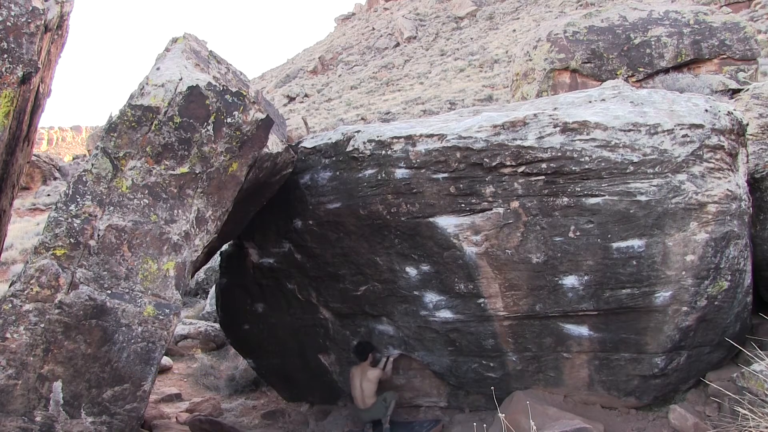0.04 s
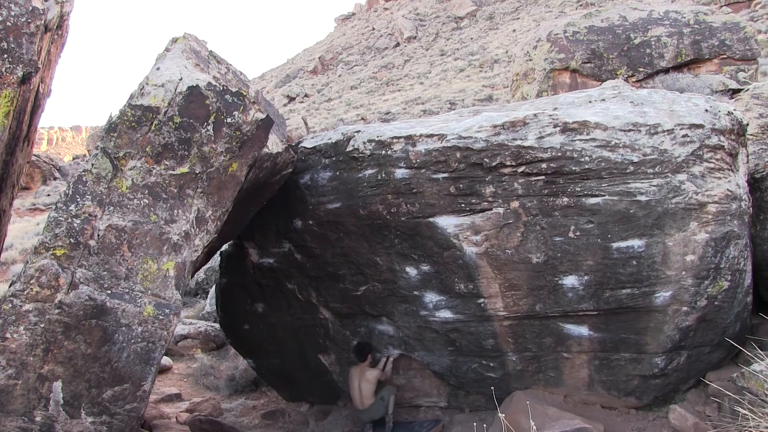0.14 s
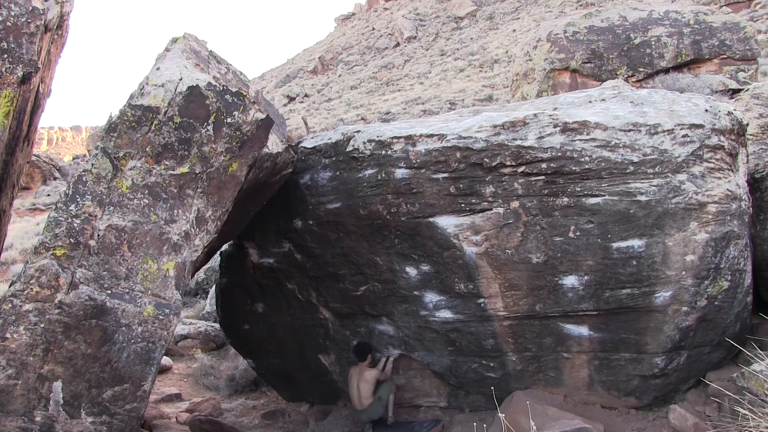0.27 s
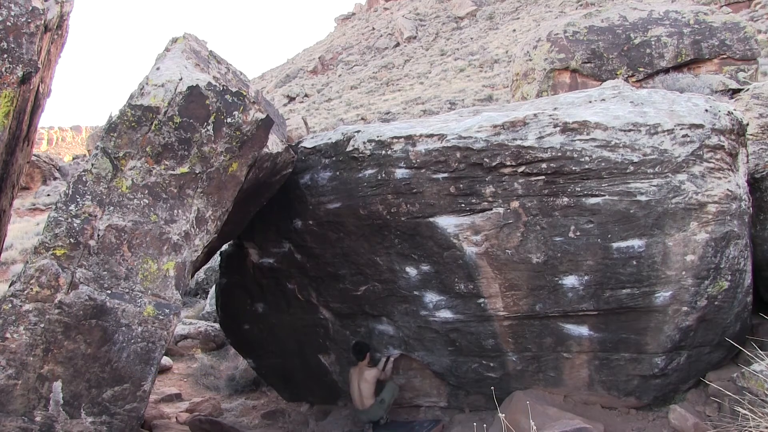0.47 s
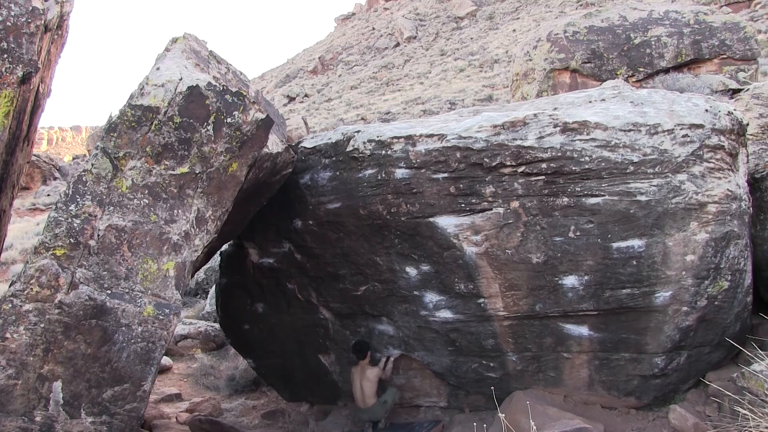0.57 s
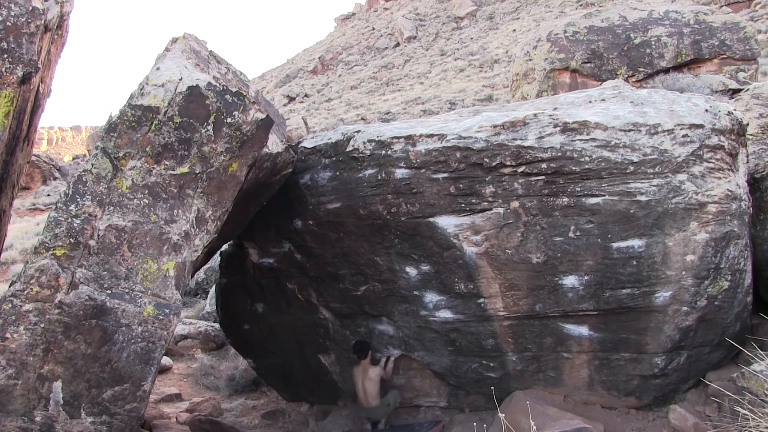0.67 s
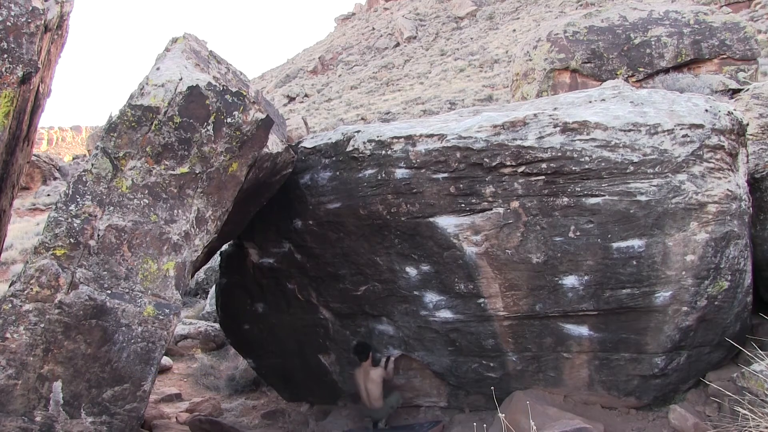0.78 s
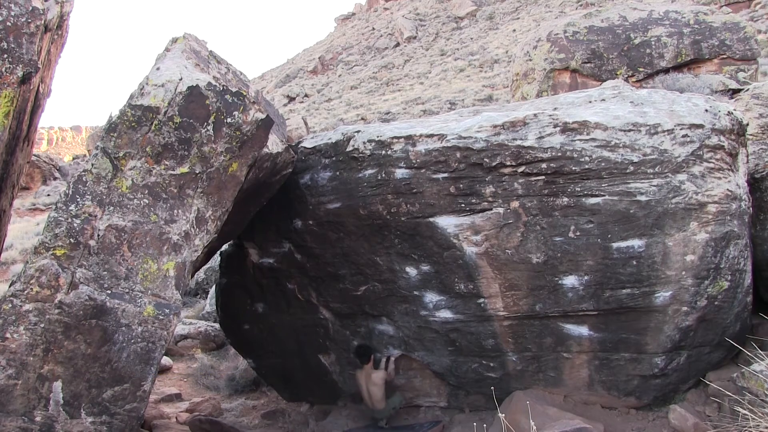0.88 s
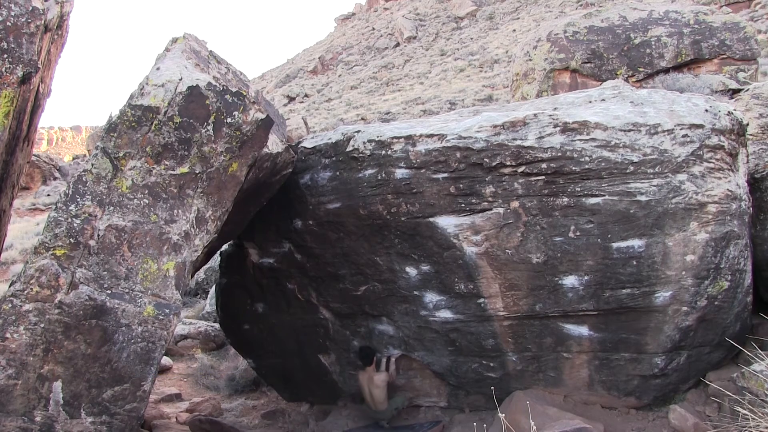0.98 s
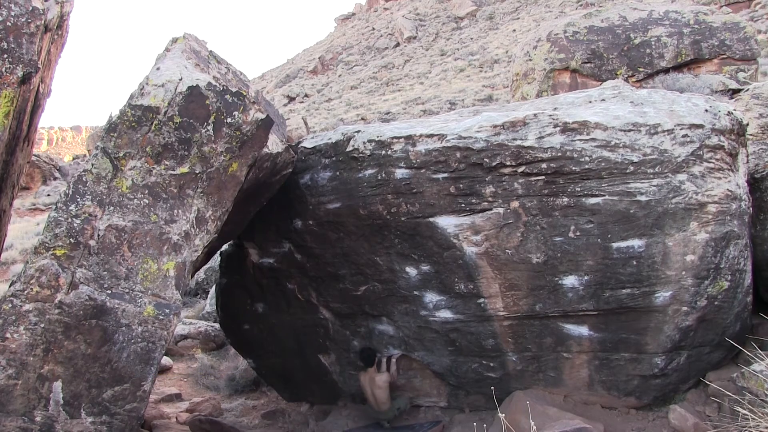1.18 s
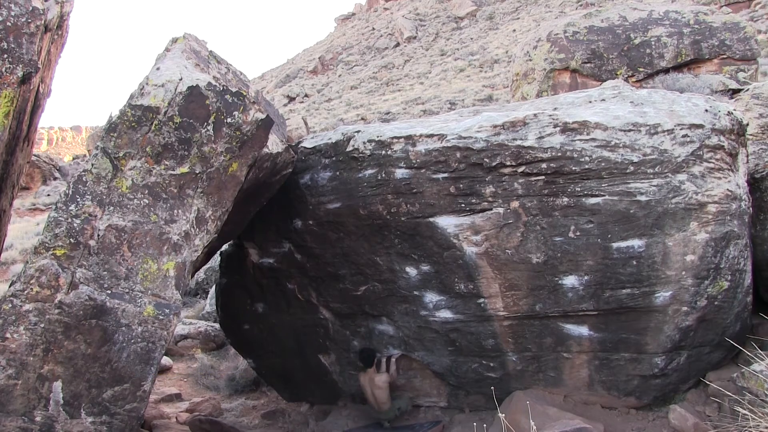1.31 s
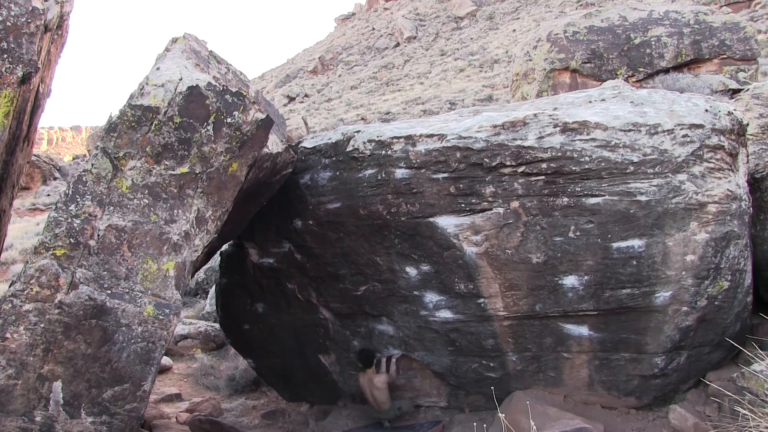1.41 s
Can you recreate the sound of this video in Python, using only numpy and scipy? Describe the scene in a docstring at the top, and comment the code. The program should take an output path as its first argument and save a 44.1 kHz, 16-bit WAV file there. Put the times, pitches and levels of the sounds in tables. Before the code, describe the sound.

A brush scrubs gritty rock in a short, swelling stroke from about 0.2 to 0.4 seconds, its head bumping softly. A light touch follows around 0.7. The second stroke swells from 0.8 to 1 second, with a brief squeak at 0.9 and more dull bumps. The overhang adds a short echo. Low outdoor rumble and soft hiss continue throughout, with faint bird chips near 0.7 and 1.4 seconds.

```python
"""Under a sandstone overhang, a climber scrubs a hold: two swelling brush strokes, a light touch between.
Bristles snapping over grit make friction noise, the brush head bumps the rock in damped vibrations,
and stick-slip gives one squeak. The rock faces return a short reverberation.
Behind it lie a low outdoor rumble, a soft hiss and a few faint bird chips."""
import sys
import numpy as np
from scipy import signal
from scipy.fft import rfft, irfft, next_fast_len
from scipy.io import wavfile
from scipy.ndimage import map_coordinates

SR = 44100
rng = np.random.default_rng(int(sys.argv[2]) if len(sys.argv) > 2 else 0)


def to_wav(s):
    """Save 16-bit WAV."""
    ch = np.atleast_2d(s).T  # columns
    pcm = np.round(np.clip(ch, -1, 1) * 32767)  # PCM
    wavfile.write(sys.argv[1], SR, pcm.astype(np.int16))


N = 63945

# The course of the squeak. Each row: time in seconds, pitch in Hz, level in dB.
SQUEAK_PATH = [(.882, 1088, -57), (0.892, 1132, -44), (0.902, 1154, -47), (.91, 1168, -41),
               (0.924, 1161, -38), (0.933, 1150, -50)]


def amp(db):
    """Amplitude ratio: tenfold for every 20 dB."""
    return 10 ** (np.asarray(db) / 20)


def unit(x):
    """Normalisation to rms 1."""
    return x / np.sqrt(np.mean(x ** 2) + 1e-20)


def clock():
    """Uniform sampling times in seconds."""
    return np.arange(N) / SR


def along(points, hz):
    """Interpolation of (Hz, value) points on a logarithmic frequency axis."""
    f, v = np.transpose(points)
    return np.interp(np.log(hz + 1), np.log(f + 1), v)


def envelope(times, db):
    """Gain along a level curve, with exponential onset before it and decay after it."""
    bite_s, fade_s = .003, .012
    t = clock()
    before, after = np.maximum(times[0] - t, 0), np.maximum(t - times[-1], 0)
    return amp(np.interp(t, times, db)) * np.exp(-before / bite_s - after / fade_s)


def wobble(rate):
    """Smooth random modulation: a spline through rate Gaussian values a second."""
    return map_coordinates(rng.standard_normal(N), [clock() * rate + 2])


def filtered(x, response):
    """Linear filtering: the spectrum of x is multiplied by a frequency response."""
    size = next_fast_len(N + SR // 2)
    return irfft(rfft(x, size) * response(np.fft.rfftfreq(size, 1 / SR)), size)[..., :N]


def stereo(pair, spectrum, coherence):
    """Partial coherence: two independent noises, coloured as mid and side, form a pair of rms 1."""
    def response(hz):
        angle = np.arccos(np.clip(along(coherence, hz), -1, .999)) / 2
        return amp(along(spectrum, hz)) * [np.cos(angle), np.sin(angle)]
    mid, side = filtered(pair, response)
    return unit(np.array([mid + side, mid - side]))


def background():
    """Ambient noise, slowly modulated: a distant rumble under a hiss that eases a little."""
    # Noise spectra. Each row: frequency in Hz, relative spectral density in dB.
    rumble_spectrum = [(25, -43), (50, -17), (70, -7.5), (95, 0), (125, -2.5), (160, -7.5), (245, -7.5),
                       (370, -9), (560, -17), (800, -57), (1500, -70)]
    air_spectrum = [(290, -20), (500, -3.5), (553, -3), (603, 0.5), (902, -2.5), (1150, -4), (1540, -5),
                    (3440, -8), (13500, -18.5), (15600, -26.5)]
    # Likeness of left and right. Each row: frequency in Hz, coherence.
    coherence = [(60, 1), (130, 0.97), (250, 0.59), (550, 0.15), (1600, 0.49), (5000, 0.67), (14000, .55)]
    # The easing hiss. Each row: time in seconds, level in dB.
    air_levels = [(.1, -59), (.45, -61), (1.4, -61)]
    rumble = stereo(rng.standard_normal((2, N)), rumble_spectrum, coherence)
    rumble_db = -59 + .55 * wobble(11.66)
    air_db = np.interp(clock(), *np.transpose(air_levels)) + .36 * wobble(12.3)
    air = stereo(rng.standard_normal((2, N)), air_spectrum, coherence)
    return rumble * amp(rumble_db) + air * amp(air_db)


def bird():
    """Far chips: falling tone pulses, roughened by random frequency and amplitude modulation."""
    # Each row: centre time in seconds, pitch in Hz, level in dB.
    chips = [(0.577, 3400, -63), (.66, 3500, -57), (.734, 3360, -57), (1.299, 3320, -61.5),
             (1.323, 3370, -64), (1.429, 3590, -52.5), (1.445, 3350, -58)]
    width_s, fall_hz_per_s, jitter, roughness = .0033, 12000, .044, .57
    out = np.zeros(N)
    for centre, hz, db in chips:
        t = clock() - centre
        pitch = hz * (1 + jitter * wobble(900)) - fall_hz_per_s * t
        phase = 2 * np.pi * np.cumsum(pitch) / SR
        voice = np.sin(phase) + amp(-12) * np.sin(1.1 * phase)  # a weaker second voice above
        voice *= 1 + roughness * wobble(1500)
        out += amp(db) * np.exp(-.5 * (t / width_s) ** 2) * voice
    return out


def overhang(x):
    """Reverberation off the rock: convolution with a noise tail whose treble dies first."""
    # Each row: frequency in Hz, time to decay by 60 dB in seconds.
    decay_times = [(150, 0.1), (1000, 0.45), (4000, 0.13), (12000, 0.064)]
    delay_s = .008
    hz, t, noise = signal.stft(rng.standard_normal((2, SR // 2)), SR, nperseg=256)
    decay = amp(-60 * t / along(decay_times, hz)[:, None])
    tail = signal.istft(noise * decay, SR, nperseg=256)[1]
    wet = signal.fftconvolve(x, tail / np.linalg.norm(tail[0]), axes=1)[:, :N]
    return filtered(wet, lambda f: np.exp(-2j * np.pi * f * delay_s))


def squeak():
    """Stick-slip oscillation: the brush grips and releases at a nearly steady rate."""
    jitter, octave_db = .013, -18.5
    times, hz, db = np.transpose(SQUEAK_PATH)
    pitch = np.interp(clock(), times, hz) * (1 + jitter * wobble(400))
    phase = 2 * np.pi * np.cumsum(pitch) / SR
    return envelope(times, db) * np.sqrt(2) * (np.sin(phase) + amp(octave_db) * np.sin(2 * phase))


def bumps():
    """Damped vibration: each soft impact of the brush head on rock excites uneven, dying cycles."""
    # Each row: start in seconds, pitch in Hz, level in dB, time to decay by 60 dB in seconds.
    impacts = [(.284, 188, -34.5, .16), (.294, 92, -46, .2), (.308, 240, -41, .13), (.627, 110, -50, .07),
               (.642, 1110, -45, .06), (.703, 130, -44, .08), (.843, 265, -39, .07), (.936, 95, -47, .16),
               (.979, 285, -32.5, .06), (.998, 245, -44, .1)]
    attack_s, roughness = .0021, .31
    out = np.zeros(N)
    for start, hz, db, t60 in impacts:
        t = np.maximum(clock() - start, 0)
        ring = np.sin(2 * np.pi * hz * t + roughness * wobble(hz / 2))
        ring *= 1 + roughness * wobble(hz / 2)
        out += amp(db - 60 * t / t60) * (1 - np.exp(-t / attack_s)) * ring
    return out


def friction(spectrum):
    """Shot noise: bristle tips snap over grit as random impulses, above a smooth rub."""
    # Likeness of left and right. Each row: frequency in Hz, coherence.
    coherence = [(100, 1), (400, 0.92), (1200, 1), (2200, 0.93), (5000, 0.93), (12000, 1)]
    flicks_per_s, spread_db, flick_share = 4400, 3.5, .49
    hits = rng.random((2, N)) < flicks_per_s / SR
    flicks = hits * np.sign(rng.standard_normal((2, N))) * amp(spread_db * rng.standard_normal((2, N)))
    rub = rng.standard_normal((2, N))
    excitation = np.sqrt(flick_share) * unit(flicks) + np.sqrt(1 - flick_share) * rub
    return stereo(excitation, spectrum, coherence)


def bristles():
    """Sliding friction: three noise bands swell as the brush bites and judder with its uneven grip."""
    # Friction spectra. Each row: frequency in Hz, relative spectral density in dB.
    hiss_spectrum = [(900, -40), (1900, 0.5), (2400, 0), (2750, 4), (3100, 0), (4200, 0), (5400, -0.5),
                     (7000, -4.5), (8300, -7), (10000, -9), (12500, -18), (14200, -21), (15500, -35)]
    rasp_spectrum = [(400, -16), (690, -7), (830, 1.5), (1000, 0), (1180, -2.5), (1340, .5), (1480, -0.5),
                     (1660, -2.5), (1900, -6), (3500, -27.5)]
    scrub_spectrum = [(60, -38), (120, -19), (200, -4.5), (330, 2), (390, -2.5), (480, -1), (590, -3.5),
                      (700, -16.5), (1500, -55)]
    # Brush movements. Each row: time in seconds, then gains of hiss, rasp and low scrub in dB.
    first_stroke = [(.205, -49, -52.5, -58.5), (.244, -50.5, -47.5, -49.5), (.256, -47, -44.5, -46),
                    (.278, -45.5, -44.5, -41), (.294, -42, -41, -40), (.318, -42, -45, -47),
                    (.331, -41.5, -42.5, -44.5), (.339, -57.5, -43.5, -49.5), (.368, -62, -60, -51.5)]
    light_touch = [(0.629, -55.5, -61, -52), (.645, -58.5, -54, -61), (.664, -68.5, -64.5, -63),
                   (.706, -64.5, -62, -54.5), (.712, -61, -58.5, -60.5), (.73, -68, -62, -56.5),
                   (.79, -65.5, -61, -67)]
    second_stroke = [(0.809, -61.5, -61, -72), (.845, -55, -55.5, -50.5), (.868, -56, -51, -47),
                     (.882, -48.5, -46, -50.5), (.908, -45.5, -44.5, -52.5), (.932, -46.5, -44.5, -48),
                     (0.937, -45, -38, -45), (.953, -42.5, -41, -48.5), (0.975, -40.5, -38.5, -50.5),
                     (.984, -49, -48, -43.5), (1.012, -60.5, -57, -54)]
    hiss = friction(hiss_spectrum)
    rasp = friction(rasp_spectrum) * amp(-1.5)
    scrub = friction(scrub_spectrum) * amp(-.5)
    times, _, squeak_db = np.transpose(SQUEAK_PATH)
    rasp *= amp(.5 * envelope(times, squeak_db - squeak_db.max()))  # slightly louder during the squeak
    out = np.zeros((2, N))
    for stroke in (first_stroke, light_touch, second_stroke):
        times, *gains_db = np.transpose(stroke)
        for band, db in zip((hiss, rasp, scrub), gains_db):
            out += band * envelope(times, db)
    judder_db = .3 * wobble(rate=260)
    return out * amp(judder_db)


def scene():
    """Superposition of the direct sound, its reverberation and the background."""
    direct = bristles() + bumps() + squeak() + bird()
    return direct + amp(-16.5) * overhang(direct) + background()


def record(dry):
    """Channel imbalance and band limiting: the bass leans right and the highest treble is cut."""
    # Each row: frequency in Hz, left minus right level in dB.
    balance = [(60, -2), (300, -2), (1000, -1.5), (2500, -0.5), (12000, 0)]
    top_hz = 15750
    return filtered(dry, lambda hz: amp(np.outer([.5, -.5], along(balance, hz))) * (hz < top_hz))


dry = scene()
out = record(dry)
to_wav(out)
```